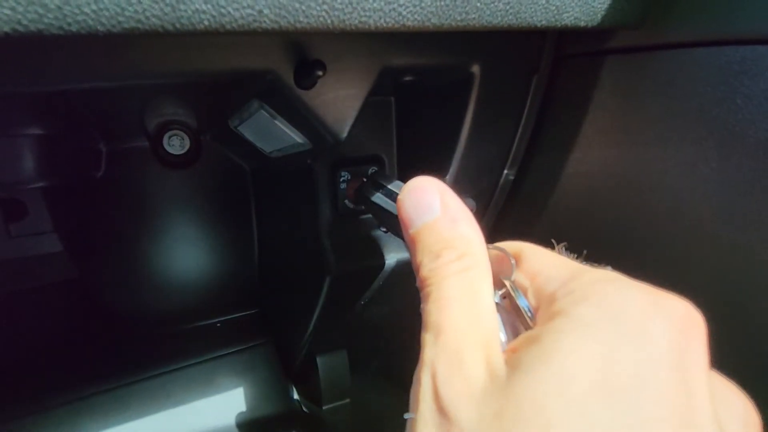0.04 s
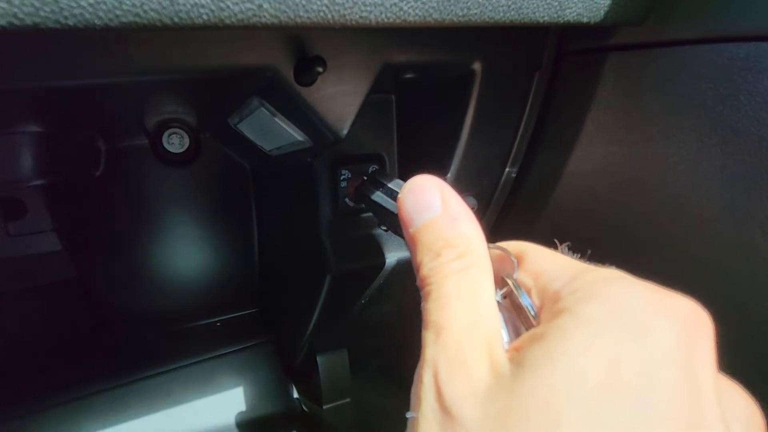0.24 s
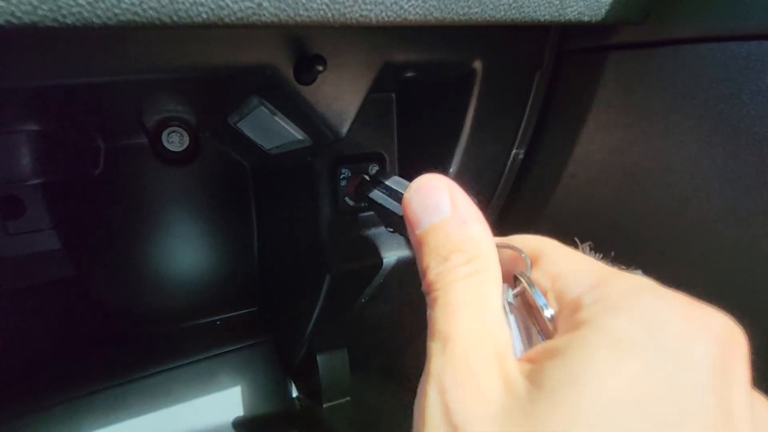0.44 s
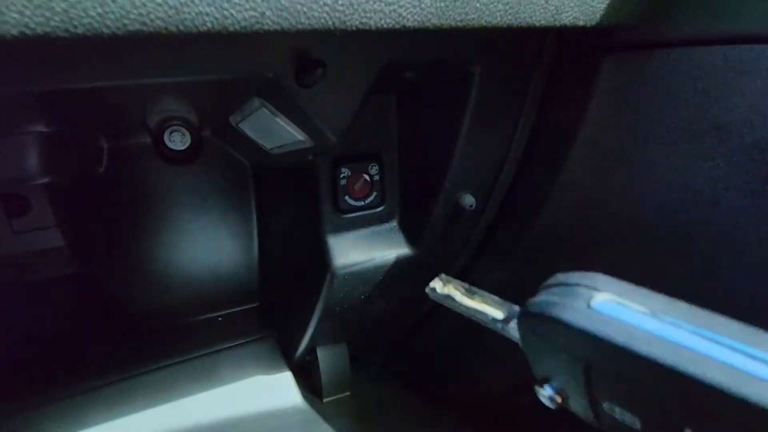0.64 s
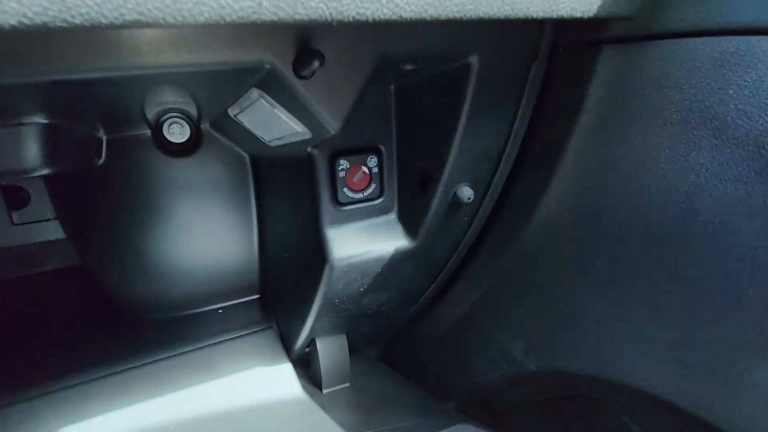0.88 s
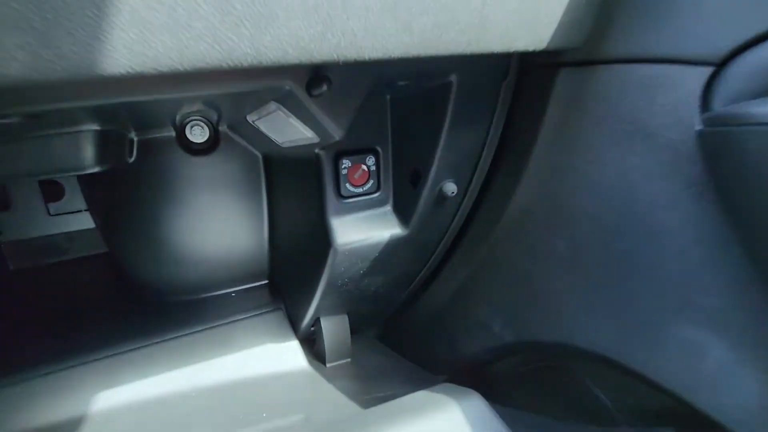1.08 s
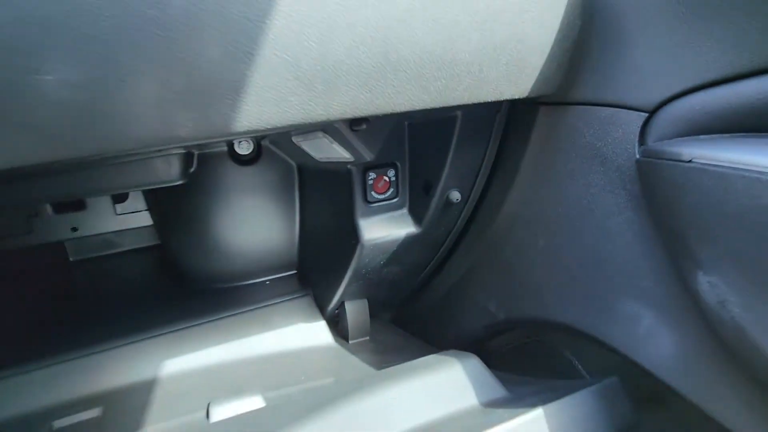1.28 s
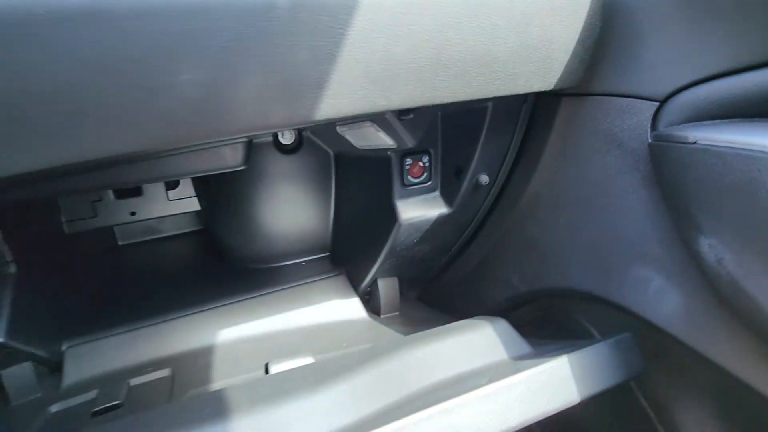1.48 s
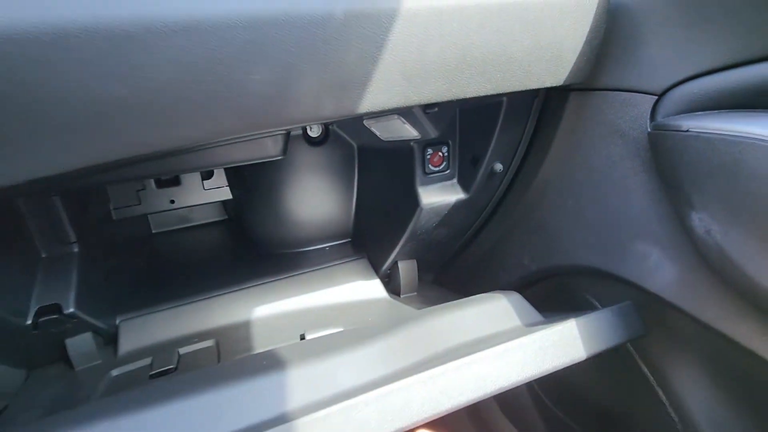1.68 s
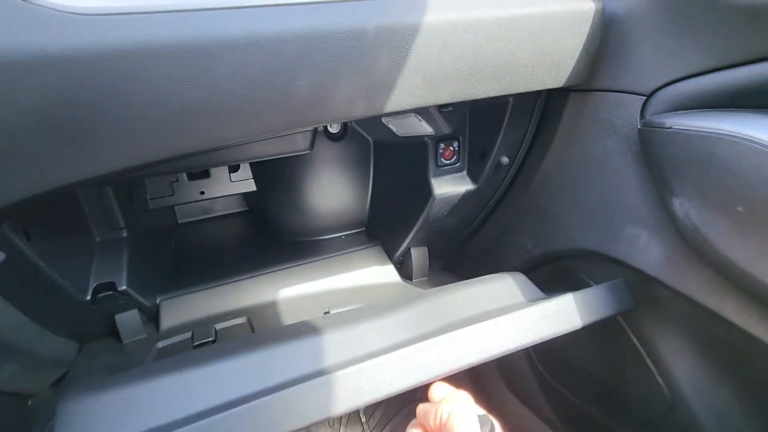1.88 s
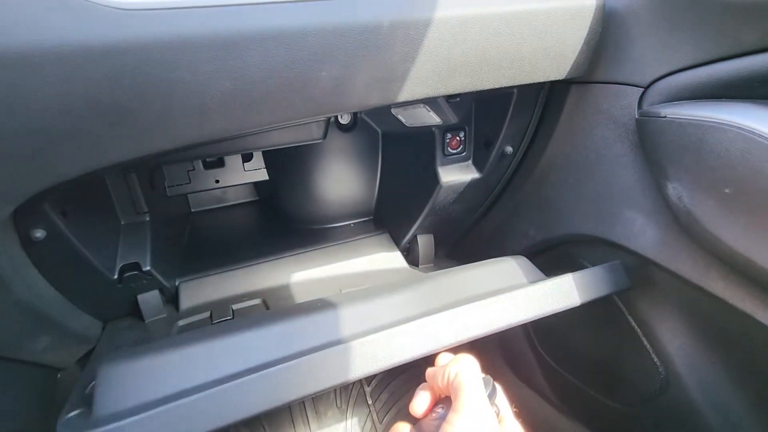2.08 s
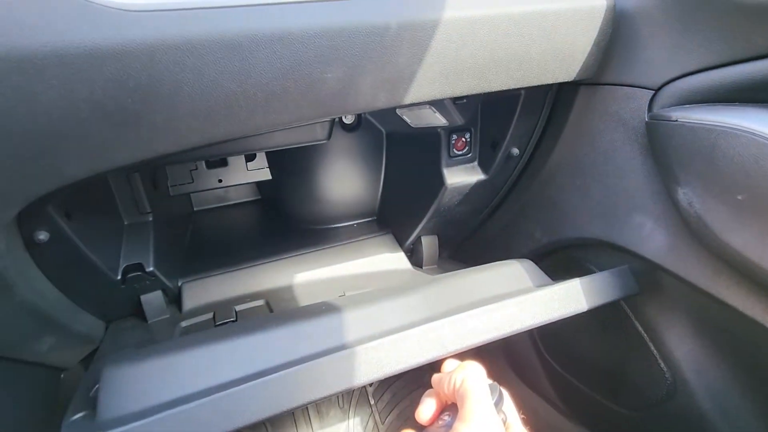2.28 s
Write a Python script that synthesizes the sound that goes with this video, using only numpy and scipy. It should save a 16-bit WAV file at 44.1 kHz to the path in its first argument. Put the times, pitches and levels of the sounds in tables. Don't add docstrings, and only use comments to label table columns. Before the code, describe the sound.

Car key pulled from a glove box switch, clacking brightly, then one sharp metallic snap

```python
import sys
import numpy as np
from scipy import signal
from scipy.fft import rfft, irfft
from scipy.io import wavfile
from scipy.ndimage import uniform_filter1d

SR = 44100
rng = np.random.default_rng(int(sys.argv[2]) if len(sys.argv) > 2 else 0)


def waveform_to_disk(signal):
    frames = np.transpose(np.atleast_2d(signal))
    scaled = np.clip(frames, -1, 1) * 32767
    samples = np.round(scaled).astype(np.int16)
    wavfile.write(sys.argv[1], SR, samples)


def magnitude_from_level(level_db):
    exponent = np.asarray(level_db, float) / 20
    return 10 ** exponent


N = 102841

# [t/s, peak level/dB, chatter length/s, favoured f/Hz, left over right/dB]
CLACKS = [(.4233, -45, 0.0017, 2600, 4), (.4466, -24, 0.0058, 5100, 0), (.470, -22.5, 0.0012, 13000, 1),
          (.4747, -14, 0.0031, 13100, -0.5), (.4775, -26, 0.0013, 14500, 0.5),
          (.4823, -9, 0.0016, 9800, -0.5), (.4855, -17, 0.0012, 13800, 5.5),
          (.4885, -26, 0.0017, 4680, 3.5), (.496, -26.5, 0.004, 4140, -3), (.5005, -28, 0.0024, 2189, 9),
          (.5195, -31, .0012, 8000, 3.5), (.5279, -28.5, 0.0011, 8320, 2), (.5435, -24, 0.002, 3510, 3.5),
          (.5494, -10.5, 0.0028, 4530, 0.5), (.5525, -20, 0.0026, 3490, 2.5), (.556, -31, 0.0013, 12000, 3),
          (.5879, -12, 0.00095, 3240, 1.5), (.626, -24, 0.0022, 3970, 0), (.6313, -24, 0.00082, 4600, 1.5),
          (.6328, -10, 0.00058, 3600, 2), (.6831, -22.5, 0.00103, 3540, -1.5),
          (.6981, -18.5, 0.00049, 4460, -3), (.7759, -15, 0.0013, 3800, -1), (.8148, -24, 0.0025, 14670, 7),
          (.8263, -27, 0.009, 14800, 4), (.8662, -26, 0.002, 5900, 4), (1.2877, -48.5, 0.0092, 4000, 6),
          (1.3316, -29.5, 0.002, 8140, -1), (1.3377, -33, 0.011, 2600, 0.5), (1.35, -43, .012, 3400, 2),
          (1.364, -37, 0.0054, 7500, 0), (1.3793, -34, 0.009, 5500, -1)]
# [t/s, peak level/dB, chatter length/s, favoured f/Hz, left over right/dB]
SNAP = [
    (1.4012, -20, 0.0023, 4530, -1),
    (1.404, -9, 0.002, 12800, -1.5),
    (1.4072, -8, 0.0023, 4600, -0.5),
    (1.4105, -12, 0.0019, 7060, -1),
    (1.414, -19, 0.0033, 1492, -1),
    (1.421, -27, 0.0097, 2200, 0),
]
# [f/Hz, level/dB]
KEY_MODES = [(2060, -13.5), (3900, -18), (4600, -6), (7120, -9.5), (9510, -13.5), (11900, -10.5),
             (12900, -10.5), (15200, -8)]
# [f/Hz, level/dB]
CLACK_COLOUR = [(470, -57), (1100, -24.5), (3000, -6.5), (4770, -7), (10200, -11), (12000, -8),
                (15300, -10), (16500, -29)]
SNAP_COLOUR = [(240, -80.5), (700, -42.5), (1400, -20.5), (2050, -12), (2670, -21.5), (4460, -16),
               (8320, -17), (15700, -15), (16500, -41.5)]
# [t/s, level/dB]
SLIDE_LEVEL = [(.39, -81), (.44, -54), (.5, -54), (.6, -45.5), (.8, -41), (.95, -38.5), (1.12, -41),
               (1.21, -48), (1.232, -70)]
# [t/s, level/dB]
RUSTLE_LEVEL = [(1.2, -76), (1.3, -67.5), (1.4, -60.5), (1.5, -71.5), (1.59, -82), (1.63, -76), (1.75, -83),
                (1.83, -78), (1.9, -86.5), (2.26, -90)]
# [f/Hz, level/dB]
SLIDE_COLOUR = [(88, -39), (150, -0.5), (560, -3.5), (847, -5), (2050, -4), (10100, -16), (12000, -10.5),
                (15600, -15), (16500, -33)]
# [f/Hz, width/Hz, level/dB]
TRIM_MODES = [(2050, 53, 0), (4550, 770, 2)]
# [t/s, level/dB]
CREAK_LEVEL = [(.36, -80.5), (.4, -55.5), (.447, -32.5), (.468, -37), (.495, -29), (.522, -38.5),
               (.54, -60), (.585, -57)]
# [f/Hz, width/Hz, level/dB]
CASE_MODES = [(200, 60, -13), (262, 50, -6), (322, 70, -4), (555, 80, -2.5), (720, 130, -5),
              (1050, 300, -8), (1490, 250, -7)]
# [centre t/s, peak level/dB, f/Hz, half length/s]
GROANS = [(0.403, -39, 245, .009), (0.411, -38.5, 165, .012), (0.418, -32, 570, .007),
          (0.429, -31, 300, .009), (.431, -36.5, 1500, .008), (.446, -26, 600, .005),
          (.446, -34, 325, .007), (.449, -26, 1470, .004), (.458, -25, 300, .006), (.46, -39.5, 540, .006),
          (0.479, -31.5, 165, .01), (.485, -28.5, 660, .005), (.487, -24, 1470, .004),
          (.494, -31, 260, .006), (.5, -34, 500, .004), (.5, -20, 1200, .004), (0.498, -34.5, 2000, .003),
          (0.509, -30.5, 345, .007), (.514, -33.5, 640, .006), (.524, -41.5, 500, .006),
          (0.573, -45, 480, .01), (.58, -45.5, 300, .01), (1.265, -46.5, 980, .005),
          (1.4094, -21, 2050, .004)]
# [t/s, peak level/dB, f/Hz]
THUMPS = [(0.38, -39.5, 234), (0.953, -22, 490), (0.96, -18, 535), (0.967, -23.5, 526), (1.264, -42, 475),
          (1.306, -42.5, 303), (1.545, -50.5, 310.4), (1.62, -55.5, 474), (1.802, -47.5, 645),
          (1.824, -47.5, 224.4), (2.03, -54, 306), (2.098, -54.5, 333.5), (2.131, -47.5, 200),
          (2.192, -52.5, 344), (2.217, -55, 336.3)]
# [centre t/s, peak level/dB, f/Hz]
BUMPS = [(0.361, -54, 130), (0.507, -33.5, 54), (0.569, -36, 59.7), (0.619, -45, 150), (0.693, -55, 98),
         (0.8, -37.5, 108), (0.862, -58, 70), (0.96, -35, 92), (1.089, -44, 54.5), (1.186, -44, 166),
         (1.212, -37, 85), (1.323, -44.5, 94), (1.385, -51, 90.3), (1.562, -48, 123), (1.642, -42, 107),
         (1.686, -43, 61), (1.707, -44.5, 80.9), (1.843, -40.5, 102.7), (1.909, -52, 68.7),
         (2.132, -48.5, 75.9), (2.253, -54, 66.44)]
# [t/s, f/Hz, level/dB]
SQUEAK = [(1.17, 7110, -110), (1.22, 7250, -64), (1.27, 7460, -74), (1.33, 7500, -69), (1.37, 7570, -110),
          (1.47, 9110, -110), (1.5, 8900, -88), (1.54, 8250, -86), (1.58, 8150, -110)]
# [t/s, level/dB]
GRIP_LEVEL = [(0., -65), (.05, -56.5), (.17, -58), (.22, -70.5), (.47, -51), (1.1, -49.5), (1.45, -57.5),
              (2.26, -60)]
# [f/Hz, level/dB]
GRIP_COLOUR = [(22, -6), (50, -4.5), (105, 0.05), (130, -13.5), (200, -31), (500, -70.5)]
# [f/Hz, level/dB]
CABIN_COLOUR = [(230, -0.5), (800, -9.5), (1300, -13.5), (4500, -24.5), (9000, -35.5), (12300, -27),
                (16500, -31.5)]
# [f/Hz, likeness/0-1]
MIC_LIKENESS = [(60, 0.9), (300, 0.82), (700, 0.63), (1400, 0), (15000, 0)]
# [f/Hz, left over right/dB]
MIC_LEAN = [(100, -.6), (1300, -4.5), (4500, .3), (12000, -.3)]


def curve(table, x, log=False):
    a = np.array(table, float)
    if log:
        return np.interp(np.log(x + 1), np.log(a[:, 0]), a[:, 1])
    return np.interp(x, a[:, 0], a[:, 1])


def decay(t, t60):
    return np.exp(-np.log(1000) * t / t60)


def peaks(table, hz):
    return sum(magnitude_from_level(db) / (1 + 2j * (hz - f) / width) * 1j ** k for k, (f, width, db) in enumerate(table))


def colour(x, table, lo=0):
    n = x.shape[-1]
    hz = np.fft.rfftfreq(n, 1 / SR)
    below = np.minimum(hz / table[0][0], 1) ** 3
    spectrum = rfft(x) * magnitude_from_level(curve(table, hz, True)) * below
    power = np.sum(abs(spectrum[..., hz > lo]) ** 2, -1)
    return irfft(spectrum, n) * n / np.sqrt(2 * np.mean(power))


def grit(shape, per_s, spread_db):
    hits = rng.random(shape) < per_s / SR
    return hits * rng.standard_normal(shape) * magnitude_from_level(spread_db * rng.exponential(size=shape))


def walk(rate):
    k = int(SR / rate)
    steps = np.repeat(rng.standard_normal(N // k + 1), k)
    return 1.4 * uniform_filter1d(uniform_filter1d(steps, k), k)[:N]


def add(out, x, s):
    i = int(s * SR)
    out[:, i:i + x.shape[1]] += x[:, :N - i]


def strikes(table, tone):
    t60, chatter_per_s, chatter_db = 0.015, 2300, 1.5
    modes_db, scatter_db, detune = -8.5, 1.5, 0.021
    favour_db, favour_octaves = 7.0, 0.3
    out, u = np.zeros((2, N)), np.arange(4096) / SR
    hz = np.fft.rfftfreq(4096, 1 / SR)
    fade = decay(u, t60)
    no_bass = 1 / (1 + (1100.0 / (hz + 1)) ** 4)
    for s, db, length, favour, pan_db in table:
        kicks = grit(4096, chatter_per_s, chatter_db) * np.exp(-(u / length) ** 2)
        kicks[0] = 1.36
        ring = np.zeros((2, 4096))
        for f, mode_db in KEY_MODES:
            level_chance, pitch_chance = rng.standard_normal((2, 2, 1))
            pitch = f * (1 + detune * pitch_chance)
            ring += magnitude_from_level(mode_db + scatter_db * level_chance) * np.sin(2 * np.pi * pitch * u)
        crack = colour(rng.standard_normal((2, 4096)), tone) * (fade ** 2 + 0.36 * np.sqrt(fade))
        crack += magnitude_from_level(modes_db) * ring * np.sqrt(fade)
        octaves = np.log2((hz + 1) / favour)
        lift = magnitude_from_level(favour_db * np.exp(-(octaves / favour_octaves) ** 2))
        x = irfft(rfft(crack) * rfft(kicks) * lift * no_bass)[:, :3500]
        left, right = x / x.std(axis=1, keepdims=True) * magnitude_from_level(np.array([[pan_db], [-pan_db]]) / 2)
        x = np.array([left + right, left - right])
        add(out, x * magnitude_from_level(db) / abs(x).max(), s)
    return out


def keys(t):
    ring_hz, ring_db, ring_t60 = 4650, -50, 0.19
    cabin_t60, wet_db = 0.033, -6
    x = strikes(CLACKS, CLACK_COLOUR) + strikes(SNAP, SNAP_COLOUR)
    u = np.maximum(t - SNAP[2][0], 0)
    x[1] += magnitude_from_level(ring_db) * np.sin(2 * np.pi * ring_hz * u) * decay(u, ring_t60)
    tail = rng.standard_normal((2, 8192)) * decay(t[:8192], cabin_t60)
    tail /= np.sqrt(np.sum(tail[0] ** 2))
    return x + magnitude_from_level(wet_db) * signal.fftconvolve(x, tail, axes=1)[:, :N]


def slide(t):
    thin_hz, thin_db_per_s = 600.0, 24.5
    dull_hz, dull_db_per_s = 8000.0, 20.0
    flicker_db, flicker_per_s = 1.2, 45.0
    hz = np.fft.rfftfreq(N, 1 / SR)
    slips = rng.standard_normal((2, N)) + 0.5 * grit((2, N), 4000.0, 2.0)
    cloth = irfft(rfft(slips) * (1 + abs(peaks(TRIM_MODES, hz))), N)
    spectrum = rfft(colour(cloth, SLIDE_COLOUR, lo=2100))
    low = 1 / (1 + (hz / dull_hz) ** 4)
    bass = 1 / (1 + (hz / thin_hz) ** 4)
    before = np.minimum(t - 1, 0)
    x = irfft(spectrum * (low - bass), N)
    x += irfft(spectrum * bass, N) * magnitude_from_level(thin_db_per_s * before)
    x += irfft(spectrum * (1 - low), N) * magnitude_from_level(dull_db_per_s * before)
    x *= magnitude_from_level(flicker_db * walk(flicker_per_s))
    drag = magnitude_from_level(curve(SLIDE_LEVEL, t)) * (t > 0.39) * (t < 1.25)
    rustle = magnitude_from_level(curve(RUSTLE_LEVEL, t) + flicker_db * walk(flicker_per_s / 2)) * (t > 1.2)
    return x * (drag + rustle)


def creak(t):
    hz = np.fft.rfftfreq(N, 1 / SR)
    body = peaks(CASE_MODES, hz) / (1 + (hz / 2500.0) ** 4)
    x = irfft(rfft(grit((2, N), 1500.0, 2.4)) * body, N)
    return x / x.std() * magnitude_from_level(curve(CREAK_LEVEL, t)) * (t > 0.34) * np.clip((0.66 - t) / 0.14, 0, 1)


def groans(t):
    wobble, least_apart = 0.55, 0.25
    out = np.zeros((2, N))
    for s, db, f, half in GROANS:
        phase = 2 * np.pi * f * (t - s) + wobble * walk(250.0) + rng.uniform(0, 2 * np.pi)
        apart = min(least_apart + f / 2200.0, 1)
        swell = magnitude_from_level(db) * np.exp(-((t - s) / half) ** 2)
        out += swell * np.array([np.sin(phase), apart * np.cos(phase)])
    return out


def thumps(t):
    t60, rise_s, bump_s = 0.038, 0.0025, 0.009
    out, u = np.zeros((2, N)), t[:4096]
    shape = decay(u, t60) * (1 - np.exp(-u / rise_s))
    for s, db, f in THUMPS:
        tone = np.sin(2 * np.pi * f * u) + 0.11 * np.sin(2 * np.pi * 4.4 * f * u)
        skin = colour(rng.standard_normal((2, 4096)), [(200.0, -1.0), (800.0, -9.0), (6000.0, -58.5)])
        add(out, magnitude_from_level(db) * (tone + 0.65 * skin) * shape, s)
    for s, db, f in BUMPS:
        out[0] += magnitude_from_level(db) * np.sin(2 * np.pi * f * (t - s)) * np.exp(-((t - s) / bump_s) ** 2)
    return out


def knock(t):
    start_s, level_db, width_s = 0.9477, -13, 0.00009
    recoil_hz, recoil_t60 = 520, 0.01
    u = t - start_s
    after = np.maximum(u, 0)
    click = np.exp(-(u / width_s) ** 2)
    recoil = 0.7 * np.sin(2 * np.pi * recoil_hz * after) * decay(after, recoil_t60)
    return magnitude_from_level(level_db) * (click - recoil) * np.array([[0.8], [1.2]])


def squeak(t):
    hz = curve([r[:2] for r in SQUEAK], t) * (1 + 0.012 * walk(600.0))
    level_db = curve([r[::2] for r in SQUEAK], t) + 3 * walk(80.0)
    return magnitude_from_level(level_db) * np.sin(2 * np.pi * np.cumsum(hz) / SR)


def grip_rumble(t):
    level_db = curve(GRIP_LEVEL, t) + 2.0 * walk(28.0)
    return colour(rng.standard_normal((2, N)), GRIP_COLOUR) * magnitude_from_level(level_db)


def cabin_air():
    return colour(rng.standard_normal((2, N)), CABIN_COLOUR, lo=100) * magnitude_from_level(-76 + 3.3 * walk(7.6))


def two_microphones(x):
    lag_s = -0.0002986
    a, b = rfft(x)
    hz = np.fft.rfftfreq(N, 1 / SR)
    like = np.clip(curve(MIC_LIKENESS, hz, True), 0, 1)
    lag = np.exp(-1j * np.pi * hz * lag_s / (1 + (340.0 / (hz + 1)) ** 2))
    turn = lag * magnitude_from_level(curve(MIC_LEAN, hz, True) / 2)
    shared = a * np.sqrt((1 + like) / 2)
    apart = b * np.sqrt((1 - like) / 2)
    return irfft(np.array([(shared + apart) * turn, (shared - apart) / turn]), N)


def scene():
    t = np.arange(N) / SR
    hand = keys(t) + slide(t) + creak(t) + groans(t) + thumps(t) + squeak(t)
    return two_microphones(hand + grip_rumble(t) + cabin_air()) + knock(t)


def top_cut(x):
    return signal.sosfilt(signal.butter(12, 17000, fs=SR, output="sos"), x)


def record(dry):
    top_hz, end_s, fade_s = 15900, 2.268, 0.002
    x = signal.sosfilt(signal.ellip(8, 0.2, 60, top_hz, fs=SR, output="sos"), dry)
    mix = x * np.clip((end_s - np.arange(N) / SR) / fade_s, 0, 1)
    return top_cut(mix)


dry = scene()
out = record(dry)
waveform_to_disk(out)
```